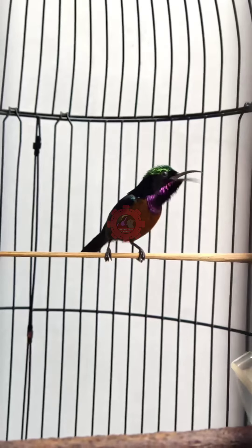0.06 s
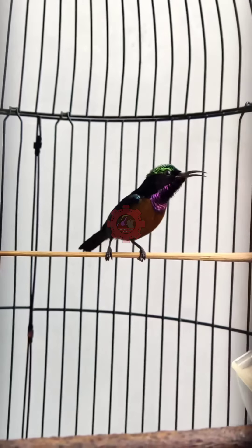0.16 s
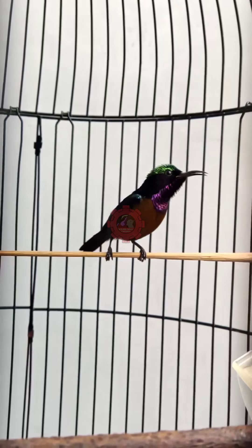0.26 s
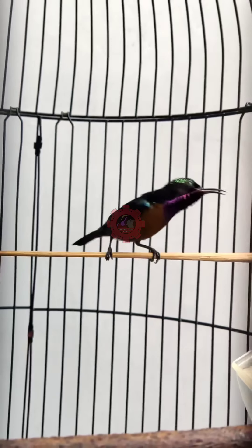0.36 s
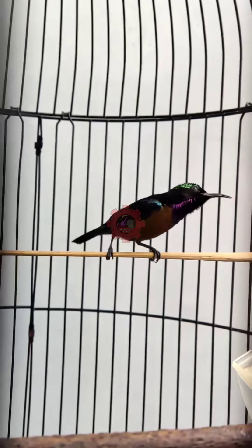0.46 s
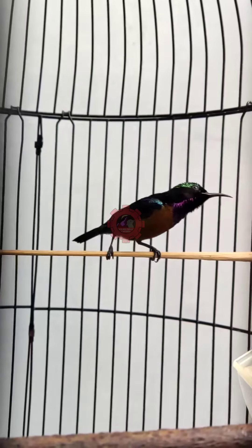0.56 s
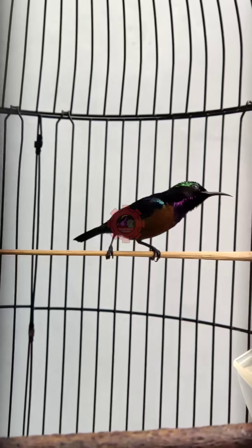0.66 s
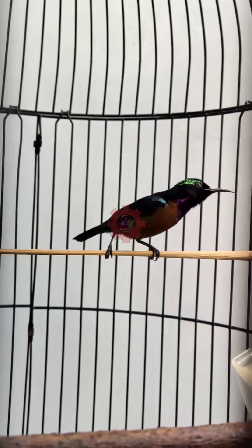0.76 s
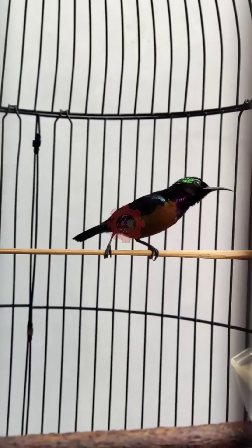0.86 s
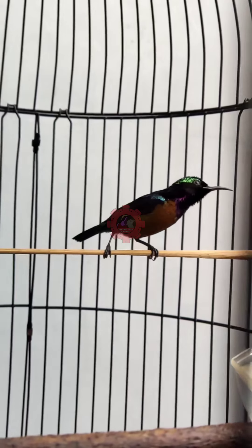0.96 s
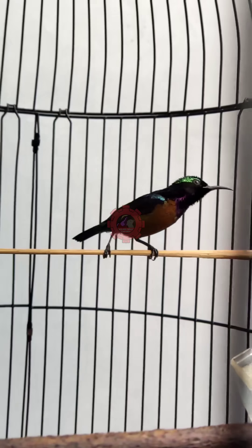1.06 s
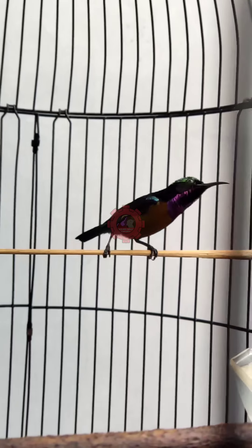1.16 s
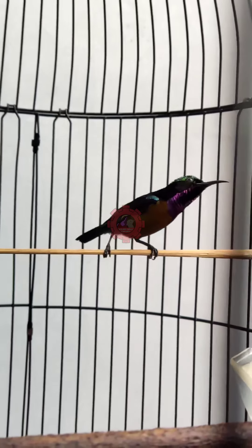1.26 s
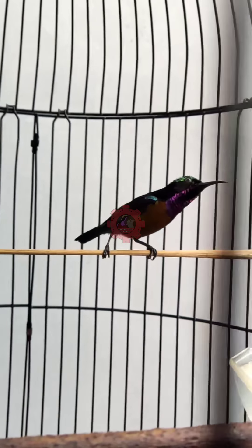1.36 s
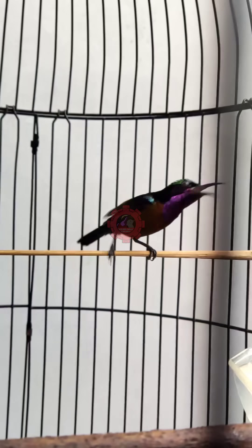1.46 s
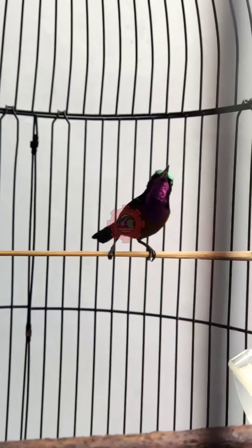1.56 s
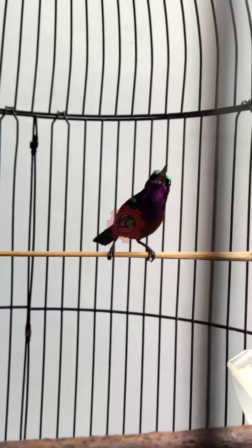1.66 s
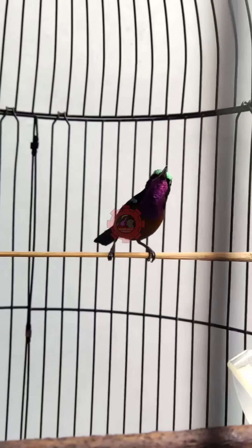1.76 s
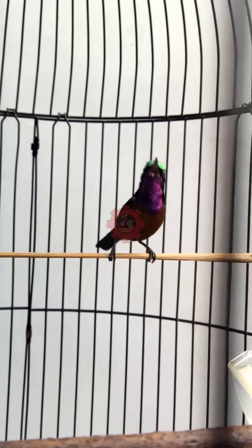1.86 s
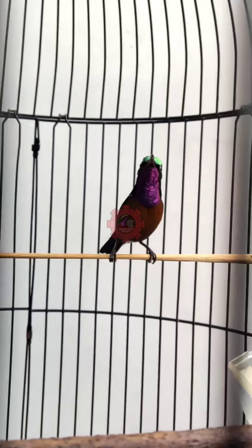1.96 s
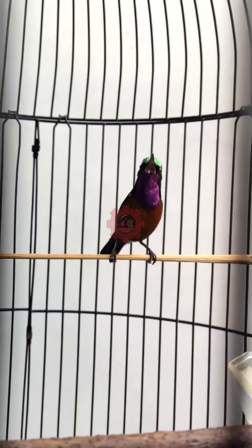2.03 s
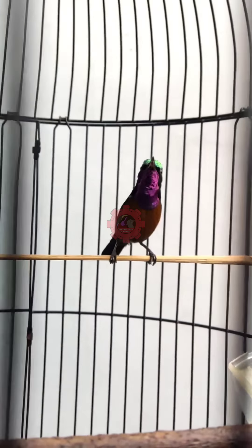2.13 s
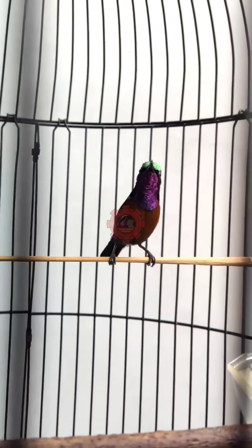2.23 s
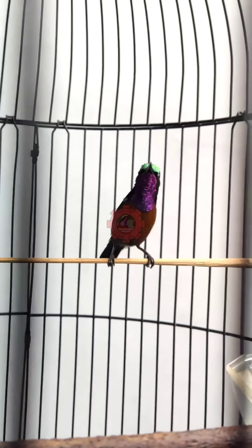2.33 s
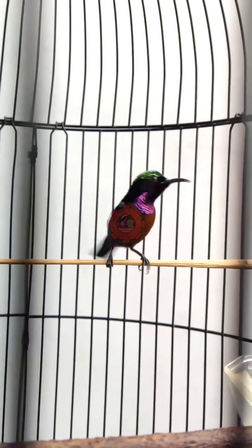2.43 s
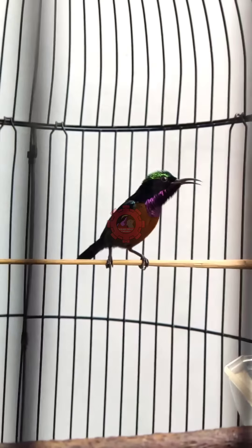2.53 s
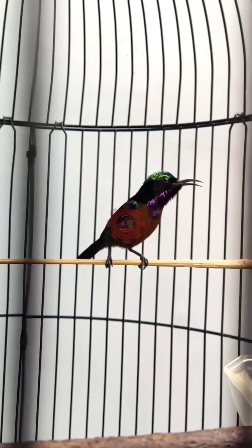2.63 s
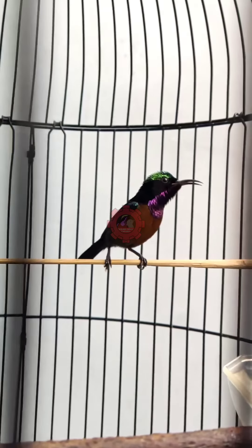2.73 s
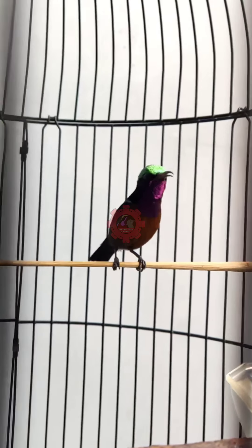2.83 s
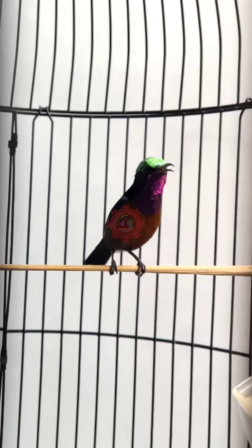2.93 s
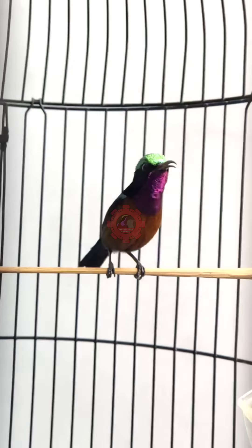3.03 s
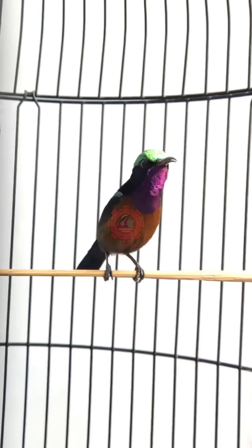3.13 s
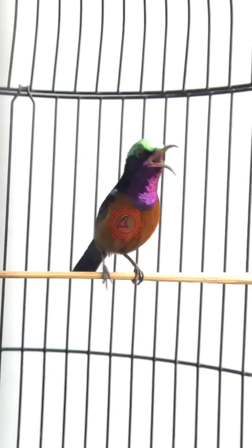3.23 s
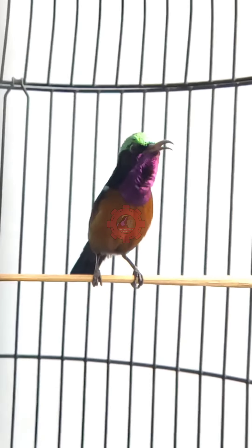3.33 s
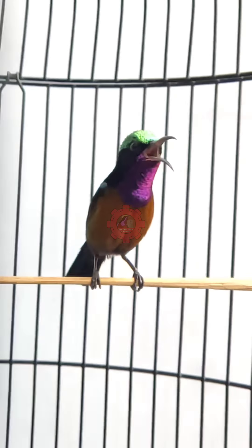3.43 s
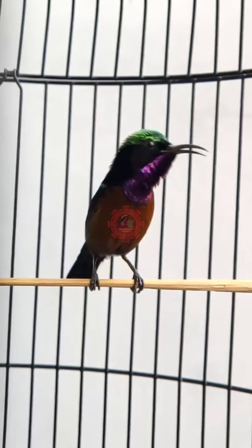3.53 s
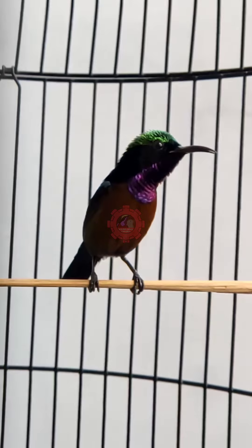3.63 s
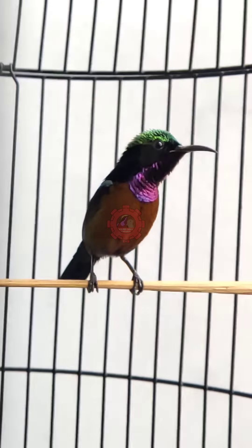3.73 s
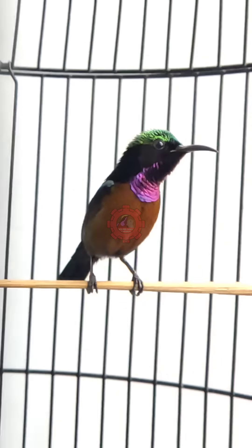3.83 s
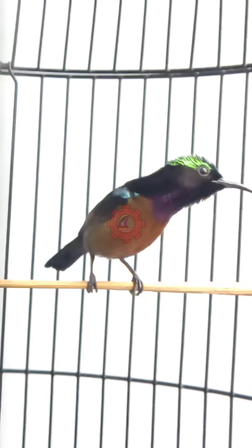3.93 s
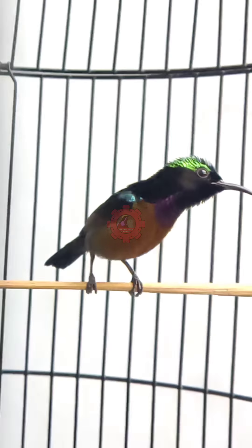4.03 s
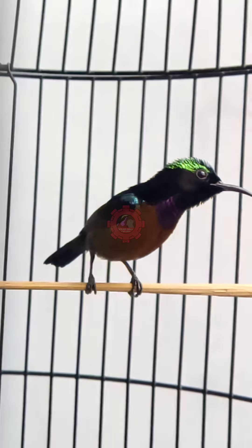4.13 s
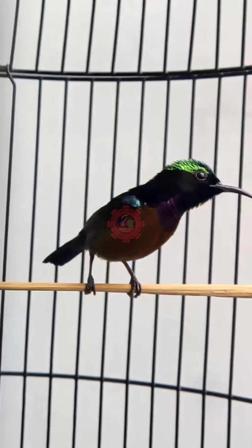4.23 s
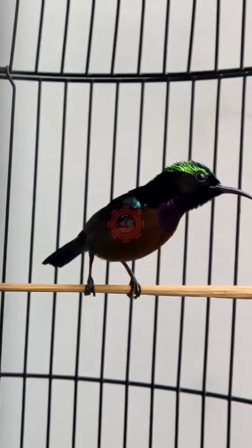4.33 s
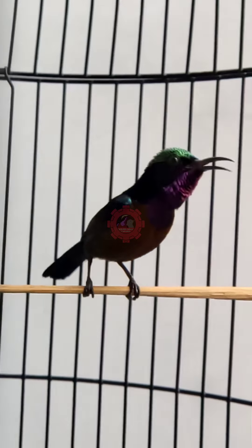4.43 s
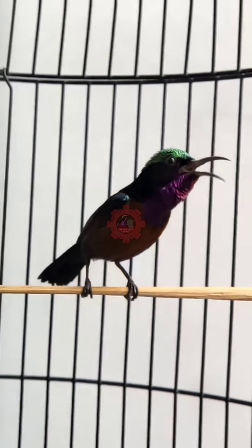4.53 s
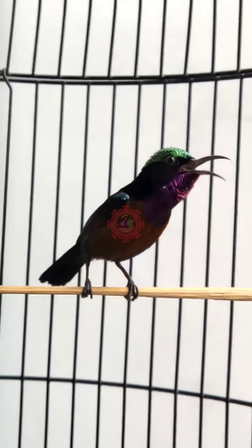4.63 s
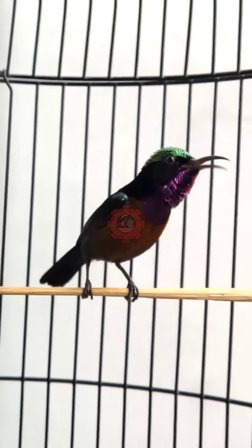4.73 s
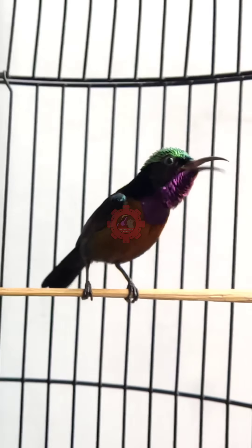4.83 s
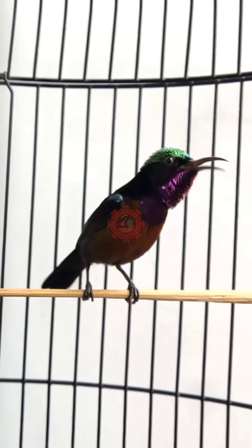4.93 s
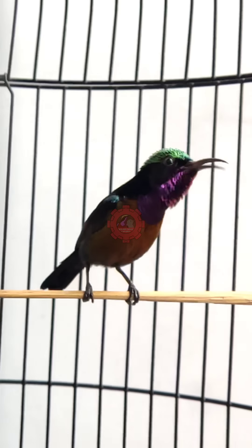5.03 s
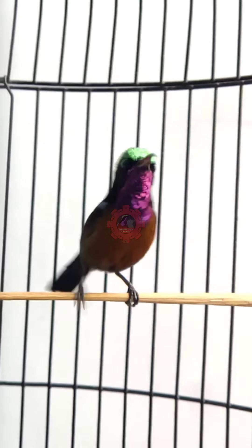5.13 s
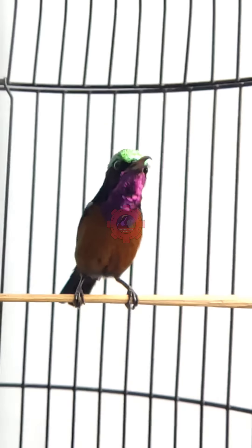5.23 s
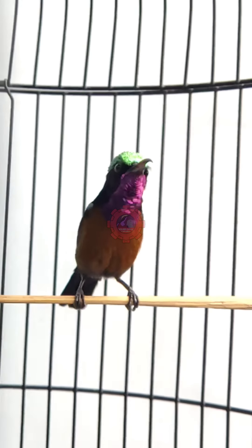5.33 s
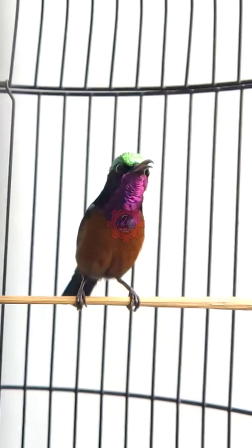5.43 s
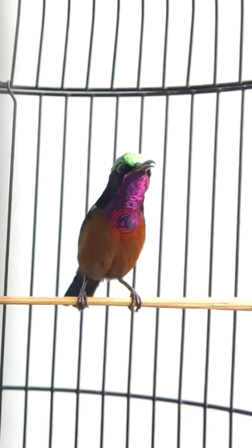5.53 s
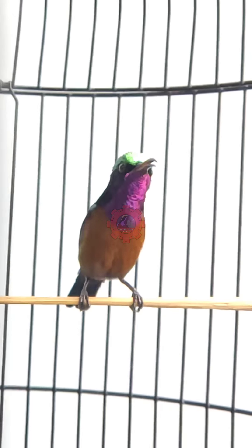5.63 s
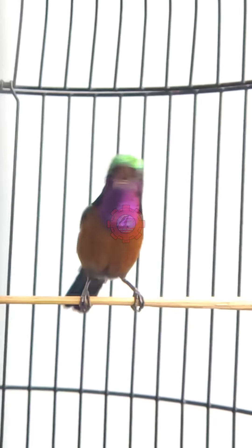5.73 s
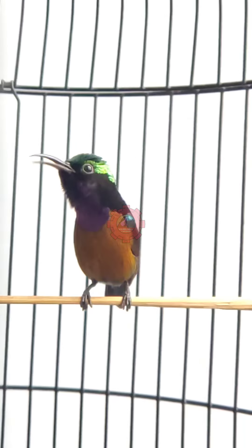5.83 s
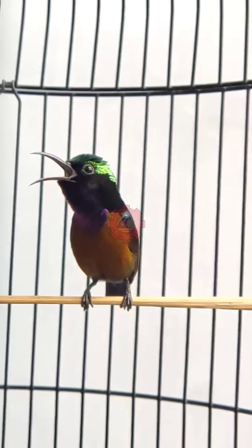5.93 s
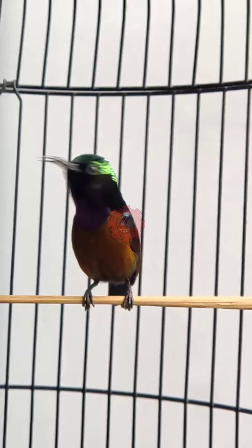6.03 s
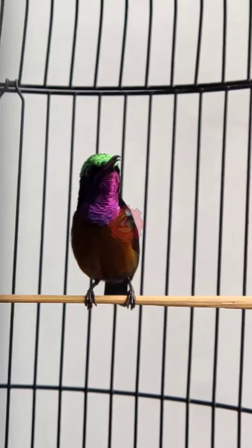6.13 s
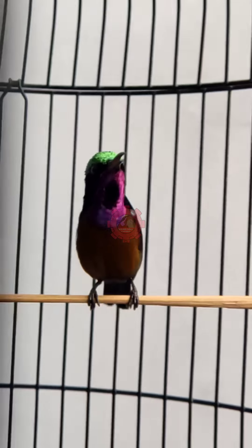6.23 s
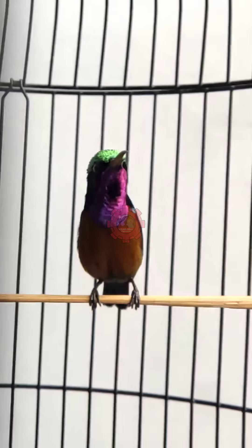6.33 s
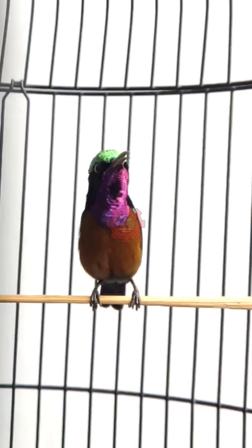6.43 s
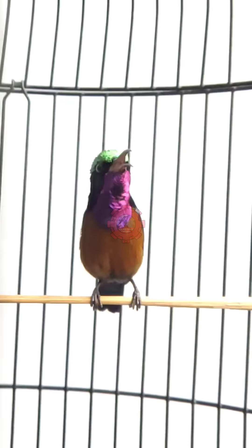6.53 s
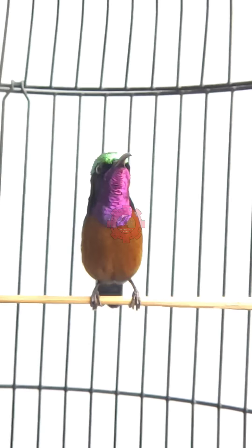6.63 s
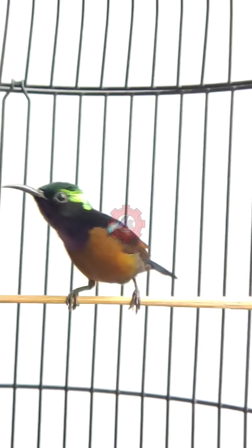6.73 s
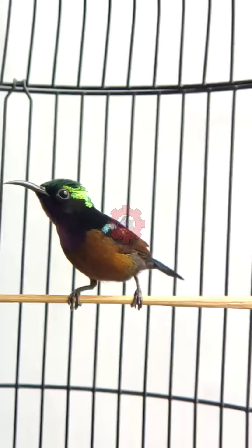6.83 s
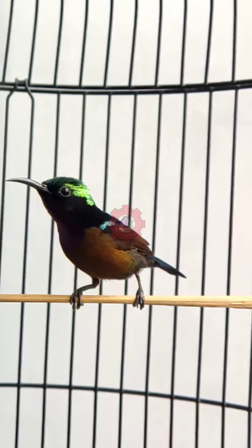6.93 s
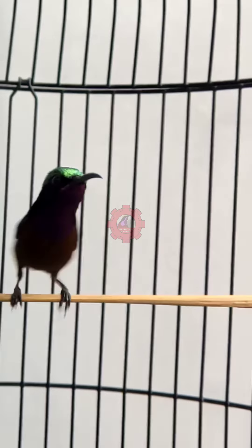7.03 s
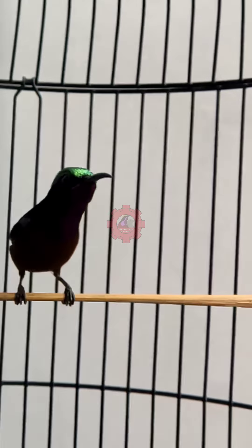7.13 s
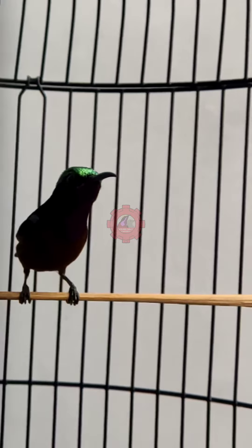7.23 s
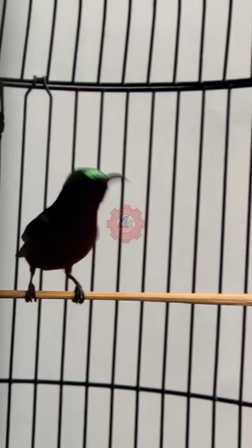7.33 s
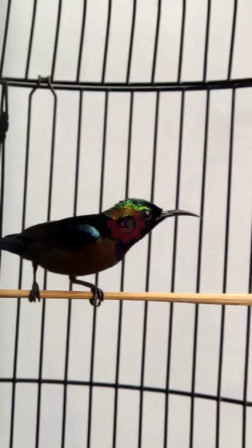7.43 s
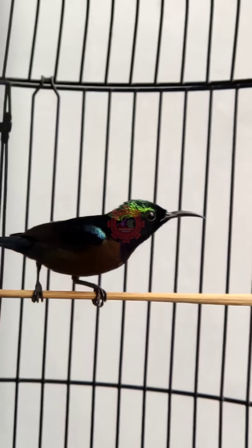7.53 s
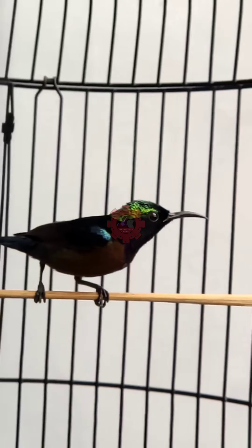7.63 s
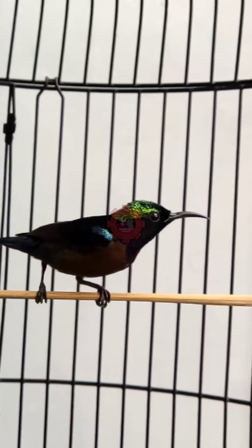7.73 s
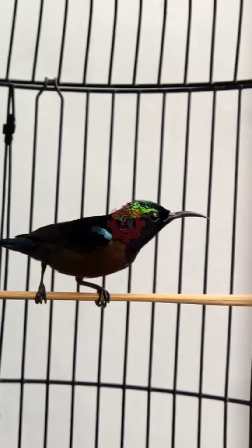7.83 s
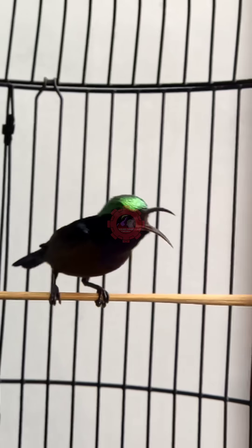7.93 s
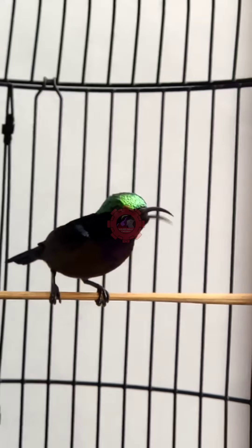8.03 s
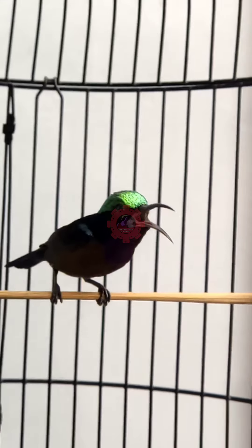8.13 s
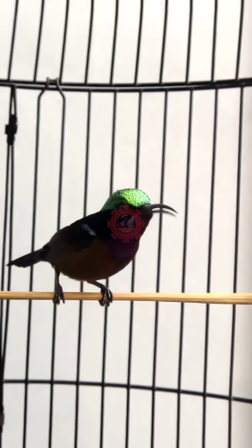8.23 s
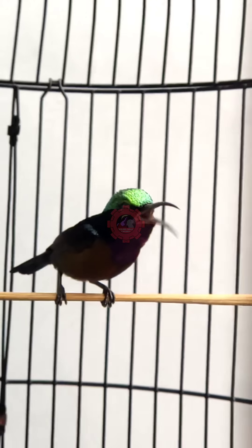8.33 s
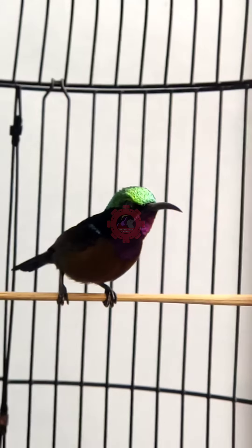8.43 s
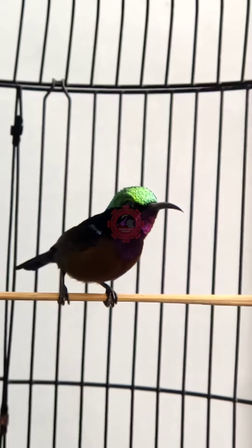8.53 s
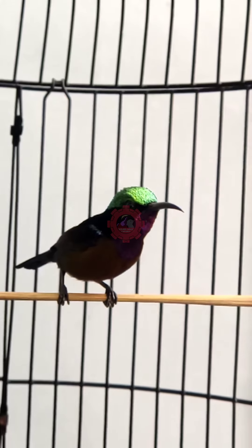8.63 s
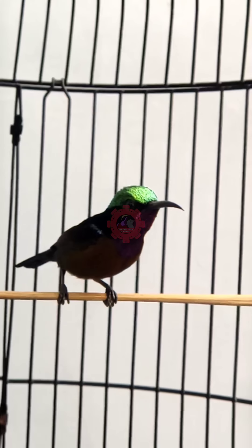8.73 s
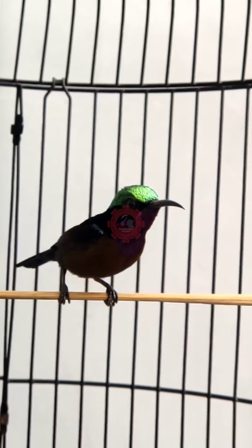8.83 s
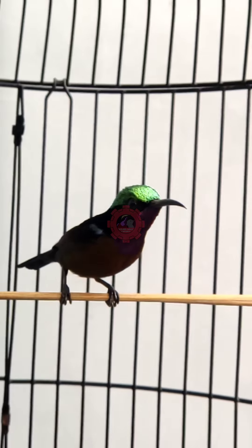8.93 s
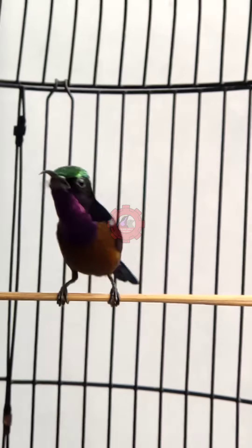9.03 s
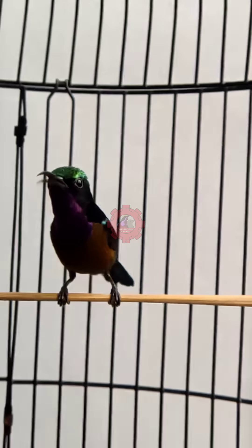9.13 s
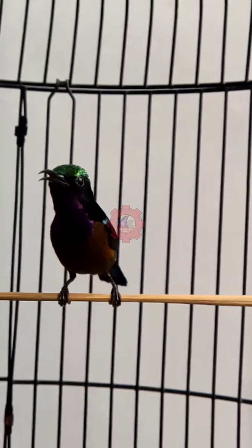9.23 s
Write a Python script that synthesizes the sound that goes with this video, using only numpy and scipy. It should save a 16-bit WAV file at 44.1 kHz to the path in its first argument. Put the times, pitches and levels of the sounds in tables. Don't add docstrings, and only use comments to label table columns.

```python
import sys
import numpy as np
from scipy import signal
from scipy.fft import rfft, irfft, next_fast_len
from scipy.io import wavfile
from scipy.ndimage import uniform_filter1d

SR = 44100
rng = np.random.default_rng(int(sys.argv[2]) if len(sys.argv) > 2 else 0)


def wrap_up_sound(samples):
    columns = np.atleast_2d(samples).T
    tamed = np.clip(columns, -1, 1)
    steps = np.round(tamed * 32767).astype(np.int16)
    wavfile.write(sys.argv[1], SR, steps)


def undo_db(level):
    steps = np.asarray(level, float) / 20
    return 10 ** steps


N = 408807


def band(x, lo_hz, hi_hz):
    return signal.sosfilt(signal.butter(2, [lo_hz, min(hi_hz, .45 * SR)], "band", fs=SR, output="sos"), x)


def unit(x):
    return x / np.sqrt(np.mean(x ** 2))


def walk(rate):
    k = int(SR / rate)
    steps = np.repeat(rng.standard_normal(N // k + 1), k)
    return np.sqrt(2) * uniform_filter1d(uniform_filter1d(steps, k), k)[:N]


def add(out, x, s):
    i = int(s * SR)
    out[..., i:i + x.shape[-1]] += x[..., :N - i]


def glide(u, at, values):
    k = np.interp(u, at, np.arange(len(at)))
    i = np.minimum(k.astype(int), len(at) - 2)
    return np.take(values, i) + np.diff(values)[i] * (1 - np.cos(np.pi * (k - i))) / 2


def left_right(pan_db):
    return undo_db(np.array([[1], [-1]]) * pan_db / 2)


# (frequency [Hz], level under the tone [dB])
OVERTONE_COLOUR = [(7500, -24.5), (9000, -19), (10500, -17.5), (12000, -26.5), (13200, -38), (14500, -33.5),
                   (15500, -37.5)]
THIRD_DB, OVERTONE_ROUGH, OVERTONE_PAN_DB = 3, 0.45, 3
AIR_DB, AIR_HZ = -36, 2140


def whistle(hz, db, pan_db, attack_s, release_s, overtone_db):
    t = np.arange(len(hz)) / SR
    phase = 2 * np.pi * np.cumsum(hz) / SR
    at_hz, at_db = np.transpose(OVERTONE_COLOUR)

    rough = OVERTONE_ROUGH * (np.array([2, 3])[:, None, None] * hz / 10000) ** 4
    flutter = 1 + rough * unit(band(rng.standard_normal((2, 2, len(t))), 25, 310))
    flutter /= np.sqrt(1 + rough ** 2)
    second = undo_db(np.interp(2 * hz, at_hz, at_db)) * np.sin(2 * phase) * flutter[0]
    third = undo_db(np.interp(3 * hz, at_hz, at_db) + THIRD_DB) * np.sin(3 * phase) * flutter[1]
    third *= 3 * hz < .45 * SR
    overtones = undo_db(overtone_db) * left_right(OVERTONE_PAN_DB) * (second + third)

    air_db = AIR_DB + 6.6 * np.tanh(rng.standard_normal())
    air = undo_db(air_db) * unit(band(rng.standard_normal((2, len(t))), 300, AIR_HZ))
    breath = band(band(np.sin(phase) * air, 3500, 9500), 3500, 9500)

    nearest_edge = np.minimum(t / attack_s, (t[-1] - t) / release_s)
    edges = np.sin(np.pi / 2 * np.clip(nearest_edge, 0, 1)) ** 2
    return np.sqrt(2) * (np.sin(phase) + breath + overtones) * edges * undo_db(db) * left_right(pan_db)


# (time [s], length [s], top [Hz], level [dB], start under the top [dB])
RISES = [(.07, 0.055697, 5237, -5.5, -4), (0.167, 0.051, 5285, -7, -10), (0.265, .048, 5170, -8, -4),
         (.365, 0.047, 5223, -6.5, -6), (.4656, 0.048, 5100, -10.5, -3), (2.5418, 0.051, 5070, -4, -3.5),
         (2.639, 0.045, 5154, -6, -5), (2.7258, .048, 5220, -7.5, -5.5), (2.82, .05, 5225, -5.5, -5.5),
         (2.9268, 0.049, 5230, -5.5, -2.5), (3.006, 0.056, 5140, -6, -11.5), (3.1122, 0.047, 5131, -5, -4)]
# (time [s], length [s], top [Hz], level [dB], start under the top [dB])
LATE_RISES = [(4.4738, 0.05729, 5210, -5.5, -3), (4.5728, 0.048, 5220, -6.5, 0),
              (4.6724, 0.047, 5265, -7, -0.5), (4.7751, 0.051, 5236, -6.5, -3.5),
              (4.8711, 0.047, 5156, -6, -2), (4.9746, 0.047, 5120, -8, 1.5), (5.0846, 0.046, 5246, -5, -5),
              (5.1868, 0.044, 5225, -5.5, 0), (5.279, 0.045783, 5190, -5.5, -7),
              (5.394, 0.053, 5174, -5, -2), (5.5151, .049, 5120, -5.5, -1),
              (5.6323, 0.049242, 5790, -7.5, -1.5), (6.2152, .056, 5123, -6, 1),
              (6.3219, 0.048, 5203, -6, -3.5), (6.4196, 0.049, 5134, -7.5, -3),
              (6.5447, 0.048, 5040, -6.5, -1.5), (9.0453, 0.053, 5154, -7.5, 3.5),
              (9.1423, 0.048, 5185, -7.5, -1), (9.236, 0.047, 5273, -8, -2)]
RISE_SHAPE = [
    (0, -.28),
    (0.122, 0),
    (0.318, .13),
    (0.501, .38),
    (0.722, .82),
    (0.862, .99),
    (1, 0.99),
]
# (time [s], length [s], crest [Hz], second crest [Hz], level [dB])
FALLS = [(1.511, 0.13, 7285, 6140, -3), (1.6834, 0.12686, 7410, 6190, -4), (1.874, .12, 7195, 6046, -4.5),
         (2.0593, 0.13, 7294, 5990, -5.5), (3.2662, .13, 7290, 6120, -5.5), (3.4659, .13, 7388, 6260, -4.5),
         (5.7646, .12, 7228, 5990, -4.5), (5.9337, 0.12984, 7505, 6270, -5), (7.9441, .13, 7207, 6260, -6),
         (8.1155, .13, 7400, 6150, -5.5), (8.301, 0.13, 7253, 6010, -5.5)]
# (time [s], length [s], pitch [Hz], level [dB])
SQUEAKS = [(0.206, 0.012, 6090, -25), (2.667, 0.013, 6140, -23.5), (2.956, .011, 6063, -26),
           (3.145, 0.017, 6290, -34), (4.808, 0.015, 6070, -26.5), (5.312, 0.018, 6360, -32)]
# (time [s], left minus right [dB])
HEAD = [(.1, -3), (.5, -4), (1.6, -1), (1.9, -0.2), (2.1, 3.5), (2.55, -1.5), (2.75, -2), (2.9, 0),
        (3.5, -1.56), (4.5, -1), (4.8, -3.5), (5.2, 1), (5.5, -1.5), (5.9, -2), (6.5, 0), (7.95, 0),
        (8.3, 4), (9.05, -2)]
SHELF_HZ, RISE_PAN_DB = 4092, -2.5
LINGER, USUAL_S = 1.6, .049
DIP_HZ, END_HZ, FALL_PAN_DB = 5660, 4330, 2.5
DIP_DB, SECOND_DB, END_DB = -12.5, -6, -11
SCOOP_HZ, OPENING_HZ, PAUSE_S = -520, 324, .4
POSES = 3


def songbird():
    out = np.zeros((POSES, 2, N))
    chirps = RISES + LATE_RISES
    at, climb = np.transpose(RISE_SHAPE)
    for k, (s, length, top_hz, db, start_db) in enumerate(chirps):
        u = np.arange(int(length * SR)) / (length * SR)
        climbed = np.interp(u ** (length / USUAL_S) ** LINGER, at, climb)
        pitch = uniform_filter1d(SHELF_HZ + (top_hz - SHELF_HZ) * climbed, size=160, mode="nearest")
        level_db = db + np.interp(u, [0, .3, .55, .7, .84, 1], [start_db - 4.5, start_db, -2.5, -4.5, .6, -5])
        pan_db = np.interp(s, *np.transpose(HEAD)) + glide(u, [.3, .75], [RISE_PAN_DB, 0])
        add(out[k % POSES], whistle(pitch, level_db, pan_db, 0.0097, 0.0018, 0.54), s - .003)

    starts = [row[0] for row in chirps + FALLS]
    for k, (s, length, crest_hz, second_hz, db) in enumerate(FALLS):
        u = np.arange(int(length * SR)) / (length * SR)
        previous = max(start for start in starts if start < s)
        lead_hz = OPENING_HZ if s - previous > PAUSE_S else SCOOP_HZ
        turns_hz = [crest_hz + lead_hz, crest_hz, crest_hz - 30, DIP_HZ, second_hz, END_HZ + 330, END_HZ]
        pitch = glide(u, [0, .065, .15, .4, .59, .82, .97], turns_hz)
        pitch = uniform_filter1d(pitch, size=200, mode="nearest")
        level_db = db + np.interp(u, [0, .08, .24, .37, .58, .75, .95],
                                  [-1.5, -.4, 0, DIP_DB, SECOND_DB, END_DB - 3.5, END_DB])
        pan_db = np.interp(s, *np.transpose(HEAD)) + glide(u, [.2, .55], [0, FALL_PAN_DB])
        add(out[k % POSES], whistle(pitch, level_db, pan_db, 0.011, 0.0066, 0.6), s - .003)

    for s, length, hz, db in SQUEAKS:
        pitch = hz + np.linspace(-150, 150, int(length * SR))
        add(out[0], whistle(pitch, db, 0, 0.001, 0.0021, 0), s)
    return out


# (delay left [ms], delay right [ms], level [dB])
ECHOES = [(1.1, .8, -14.5), (2.0, 2.3, -11), (2.6918, 3.4, -13), (5.315, 4.1, -13), (9.1, 6.1, -16.5)]
# (frequency [Hz], further lag [cycles])
LEFT_TURN = [(7600, -0.0032), (8900, -0.35)]
LEFT_LAG_MS, POSE_SHIFT_MS = 0.17, .12
YARD_T60_S, YARD_DB, YARD_DULL_HZ = 0.31, -14.5, 14145
NEAR_T60_S, NEAR_DB = .1, 7


def yard(voice):
    t = np.arange(int(.5 * SR)) / SR
    decay = undo_db(-60 * t / YARD_T60_S) + undo_db(NEAR_DB - 60 * t / NEAR_T60_S)
    tail = rng.standard_normal((2, len(t))) * decay * np.clip(t / 0.015, 0, 1)
    tail *= undo_db(2.5 * walk(89.7)[:len(t)])
    tail = band(tail, 630, YARD_DULL_HZ)
    answer = tail / np.sqrt(np.sum(tail ** 2) / 2) * undo_db(YARD_DB)
    answer[:, 0] += 1
    shifts_ms = POSE_SHIFT_MS * rng.random(len(ECHOES))
    for (left_ms, right_ms, db), shift_ms in zip(ECHOES, shifts_ms):
        answer[0, int((left_ms + shift_ms) * SR / 1000)] += undo_db(db)
        answer[1, int((right_ms + shift_ms) * SR / 1000)] += undo_db(db)

    size = next_fast_len(N + len(t))
    heard = rfft(voice, size) * rfft(answer, size)
    hz = np.arange(size // 2 + 1) * SR / size
    lag_cycles = hz * LEFT_LAG_MS / 1000 + np.interp(hz, *np.transpose(LEFT_TURN))
    heard[0] *= np.exp(-2j * np.pi * lag_cycles)
    return irfft(heard, size)[:, :N]


# (time [s], length [s], start pitch [Hz], blur [Hz], level [dB])
FAR_CALLS = [(.666, 0.11, 7480, 68, -40.5), (.69, 0.23, 6100, 880, -53), (.97, 0.09, 7610, 98.8, -44.5),
             (.997, 0.057, 6200, 772, -47.5), (1.055, 0.027, 6800, 230, -44.5),
             (1.207, .13, 5900, 540, -41.5), (1.2, .1, 11240, 400, -62), (3.594, 0.078, 7720, 112.1, -40),
             (3.846, 0.098, 7490, 59, -39), (3.864, 0.17, 5950, 600, -50), (4.185, 0.16, 6410, 180, -44),
             (4.188, .12, 5600, 500, -43), (7.4, 0.06, 5120, 190, -52), (7.61, 0.099, 5150, 210, -51),
             (7.741, .1125, 7520, 120, -41.5), (7.779, 0.11, 5950, 750, -48), (2.26, .18, 1703, 4.27, -59),
             (3.395, .08, 1835, 45, -69.5), (3.51, 0.2, 1730, 30, -70.5), (7.42, 0.23, 1270, 42.23, -71)]
FAR_T60_S, FAR_SAG = .33, 1.2


def far_birds():
    out = np.zeros((2, N))
    t = np.arange(int(.6 * SR)) / SR
    for s, length, start_hz, blur_hz, db in FAR_CALLS:
        pitch = np.interp(t, [0, length], [start_hz, start_hz - FAR_SAG * blur_hz])
        phase = 2 * np.pi * np.cumsum(pitch) / SR
        low_pass = signal.butter(2, blur_hz, fs=SR, output="sos")
        smear = signal.sosfilt(low_pass, rng.standard_normal((4, len(t))))
        smear = unit(smear) + 30 / blur_hz
        t60_s = FAR_T60_S * min(blur_hz / 50, 1)
        shape = np.clip(t / 0.0057, 0, 1) * np.exp(-np.log(1000) * np.maximum(t - length, 0) / t60_s)
        call = unit(smear[:2] * np.sin(phase) + smear[2:] * np.cos(phase))
        add(out, call * shape * undo_db(db) * left_right(-3), s)
    return out


COO_S, COO_LENGTH_S, COO_CREST = 8.525, 0.452, .43
COO_LOW_HZ, COO_HIGH_HZ, COO_DB, COO_SAG_DB = 273, 394, -46.5, -5.5


def dove():
    u = (np.arange(N) / SR - COO_S) / COO_LENGTH_S
    arch = np.sin(np.pi / 2 * np.interp(u, [0, COO_CREST, 1], [0, 1, 2]))
    phase = 2 * np.pi * np.cumsum(COO_LOW_HZ + (COO_HIGH_HZ - COO_LOW_HZ) * arch) / SR
    edges = np.clip(np.minimum(u / 0.0539, (1 - u) / 0.23), 0, 1)
    tone = np.sin(phase) + undo_db(-43) * np.sin(2 * phase)
    return np.sqrt(2) * tone * edges * undo_db(COO_DB + COO_SAG_DB * arch ** 3)


# (centre [Hz], width [Hz], level [dB], left minus right [dB])
CICADAS = [
    (9040, 1100, -53, -6),
    (7080, 190, -61, -7.5),
    (4800, 900, -57.5, -3.5),
    (13300, 5500, -68.5, -1.5),
]
# (time [s], peak level [dB])
PUFFS = [(0.592, -59), (0.7498, -58.5), (0.8981, -67), (1.0386, -50), (2.3153, -49.5), (2.4474, -55.5),
         (3.6953, -50.5), (3.823, -47), (3.9808, -49), (4.124, -49), (4.2693, -51), (6.728, -47),
         (6.8828, -50), (7.0482, -48.5), (7.3046, -61), (7.4271, -56), (7.573, -52.5), (7.7069, -54),
         (7.846, -52.5), (8.5146, -43), (8.6667, -45.5), (8.8067, -48), (8.8815, -46.5), (8.982, -42)]


def insects():
    out = np.zeros((2, N))
    for hz, width_hz, db, pan_db in CICADAS:
        hiss = unit(band(rng.standard_normal((2, N)), hz - width_hz / 2, hz + width_hz / 2))
        flicker_db = 1.2 * walk(1.47) + 1.4 * walk(11)
        out += hiss * undo_db(db + flicker_db) * left_right(pan_db)
    t = np.arange(int(.15 * SR)) / SR
    swell = (t / 0.021) ** 2 * np.exp(2 - 2 * t / 0.020955)
    for s, db in PUFFS:
        rasp = unit(band(rng.standard_normal((2, len(t))), 3600, 9000))
        add(out, rasp * swell * undo_db(db + 1.0), s)
    return out


# (frequency [Hz], level per Hz [dB])
TOWN = [(22, -1), (110, -8.5), (300, -17.5), (600, -25.5), (2200, -30.5), (6000, -43.5), (11000, -35.5),
        (15000, -57)]
TOWN_DB = -50.5
# (time [s], length [s], level [dB])
SWELLS = [
    (2.6, 1.0, 2),
    (8.4, .6, 1.5),
    (1.45, .8, -2),
    (3.3, .4, -2),
]
# (time [s], length [s], level [dB])
GUSTS = [
    (2.849, 0.38, -37),
    (8.45, 0.28, -51),
]


def town():
    out = np.zeros((2, N))
    at_hz, at_db = np.transpose(TOWN)
    for hz in 22 * 2 ** np.arange(0, 9.5, .5):
        mid, side = band(rng.standard_normal((2, N)), hz / 1.193, hz * 1.204)
        flicker_db = 1.1 * walk(1.3) + 1.7 * walk(8)
        db = np.interp(np.log(hz), np.log(at_hz), at_db) + flicker_db
        width = np.clip((hz / 1100) ** 0.7, .35, 1)
        out += undo_db(db) * (mid + width * side * np.array([[1], [-1]]))
    passing_db = np.zeros(N)
    for s, length, db in SWELLS:
        add(passing_db, db * np.hanning(int(length * SR)), s)
    out = unit(out) * undo_db(TOWN_DB + passing_db)
    for s, length, db in GUSTS:
        puff = unit(band(rng.standard_normal((2, int(length * SR))), 22, 49))
        add(out, puff * np.hanning(puff.shape[1]) * undo_db(db), s)
    return out


DUCK_DB, DUCK_S = -2, 0.12


def scene():
    bird = sum(yard(notes) for notes in songbird())
    loud = np.clip(uniform_filter1d(np.abs(bird).mean(axis=0), int(DUCK_S * SR)) / 0.05, 0, 1)
    return bird + undo_db(DUCK_DB * loud) * (far_birds() + dove() + insects() + town())


MASK_DB, MASK_SLOPE_DB, MASK_FROM_HZ, MASK_SCATTER_DB = -17, -5, 3400, 5
QUIET_DB, QUIET_FROM_HZ = -92.5, 10000


def drop_masked(x):
    hz, _, bins = signal.stft(x, SR, nperseg=1024)
    power = (np.abs(bins[:, :512]) ** 2).reshape(2, 64, 8, -1).mean(axis=2)
    power = uniform_filter1d(power, size=5)
    mask = 0
    for k in range(-2, 8):
        if k:
            mask = mask + undo_db(2 * MASK_SLOPE_DB * (abs(k) - 1)) * np.roll(power, k, axis=1)
    scatter = unit(uniform_filter1d(rng.standard_normal(power.shape[1:]), size=9))
    scatter_db = MASK_SCATTER_DB * scatter
    faint = undo_db(2 * (QUIET_DB + scatter_db)) * (hz[:512:8, None] > QUIET_FROM_HZ)
    audible = power > mask * undo_db(2 * (MASK_DB + scatter_db)) + faint
    bins[:, :512] *= np.repeat(audible, 8, axis=1) | (hz[:512, None] < MASK_FROM_HZ)
    return signal.istft(bins, SR)[1][:, :N]


def band_limit(x):
    return signal.sosfilt(signal.butter(12, 15470, fs=SR, output="sos"), x)


THUMP_DB, THUMP_HZ = -24, 39.3


def record(dry):
    thump = band(dry ** 2, 8.5, THUMP_HZ) * undo_db(THUMP_DB)
    clipped = np.clip(dry - thump, -1, 1)
    mix = np.clip(drop_masked(clipped), -1, 1)
    return band_limit(mix)


dry = scene()
out = record(dry)
wrap_up_sound(out)
```